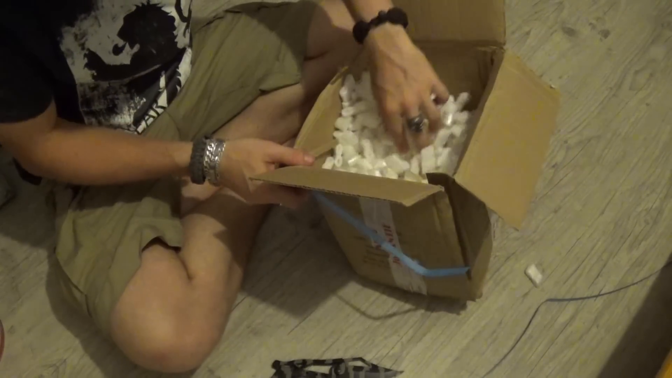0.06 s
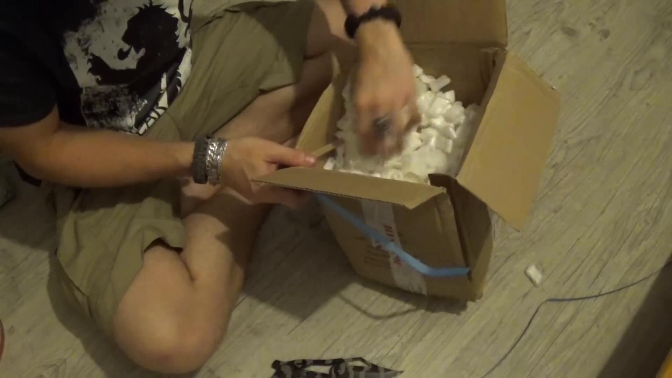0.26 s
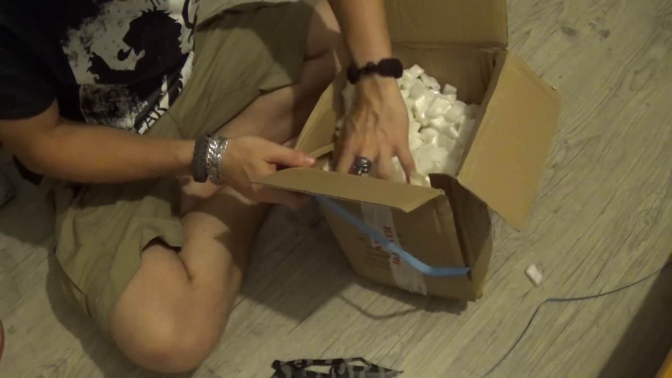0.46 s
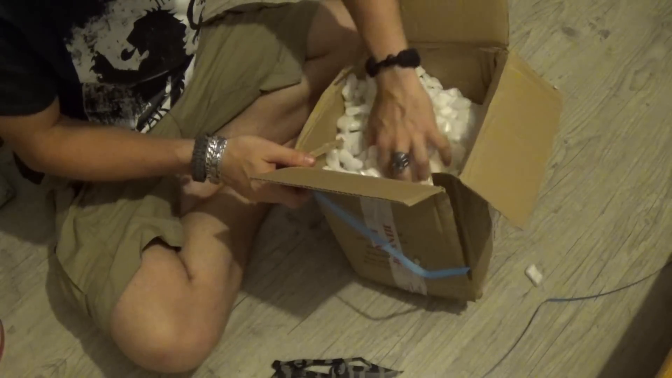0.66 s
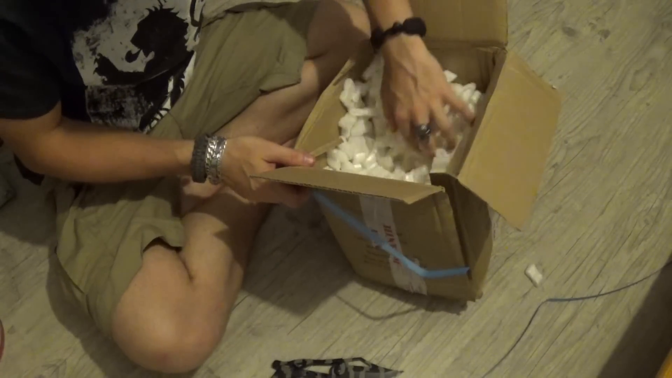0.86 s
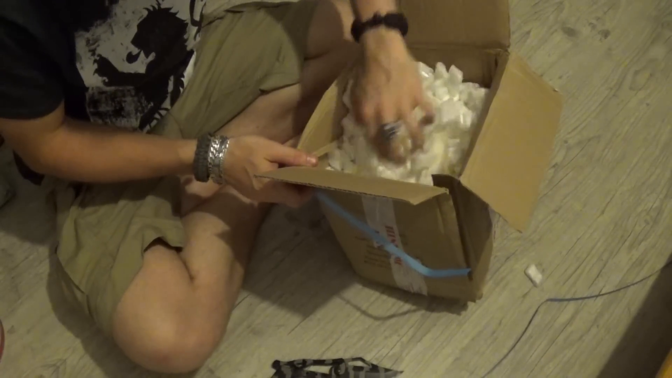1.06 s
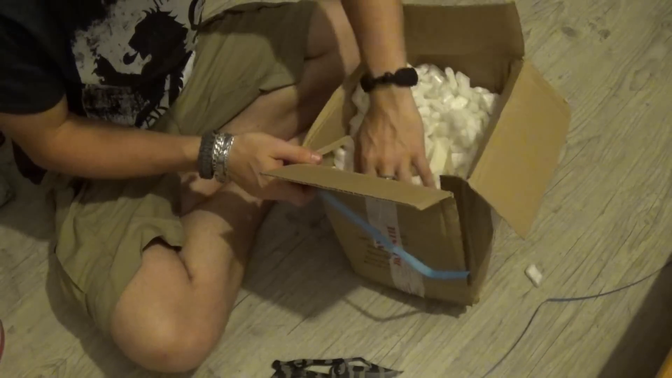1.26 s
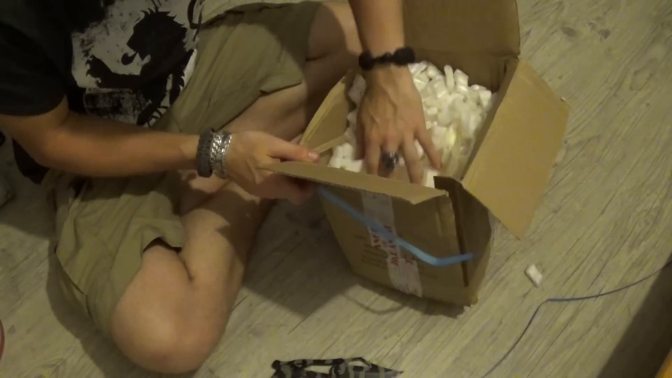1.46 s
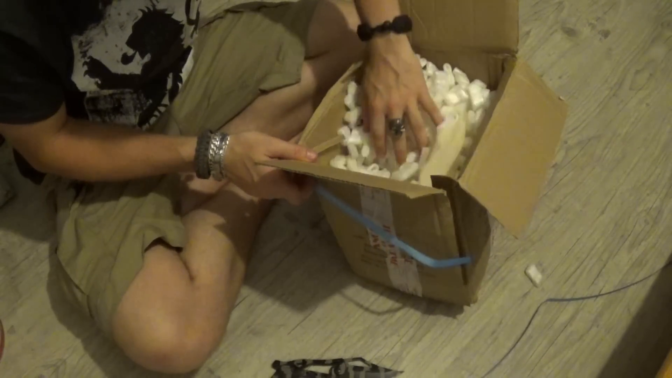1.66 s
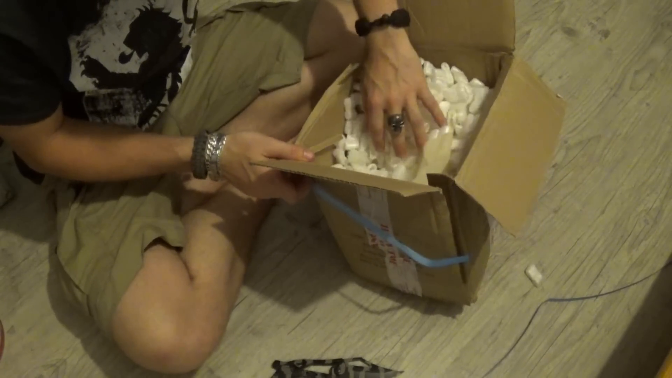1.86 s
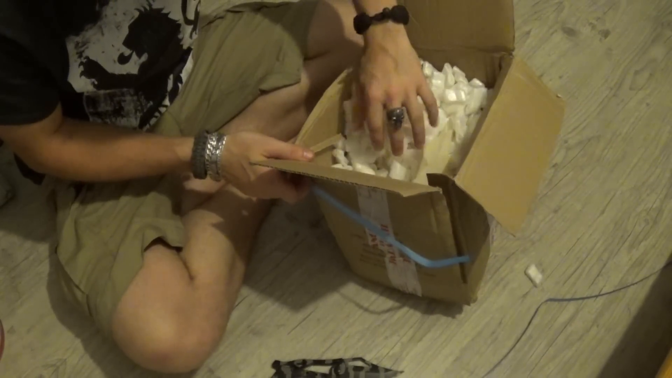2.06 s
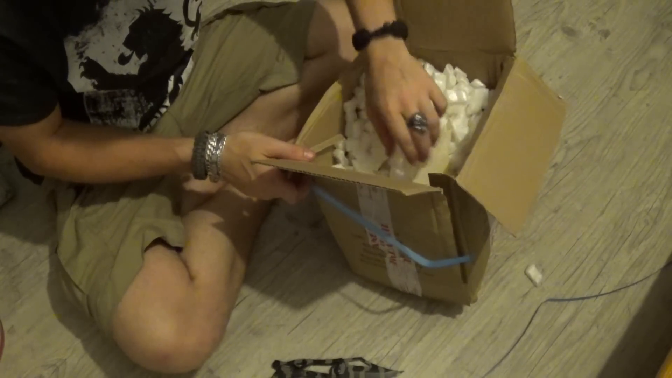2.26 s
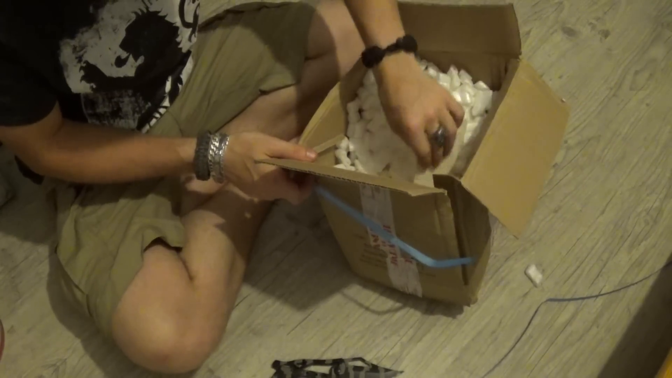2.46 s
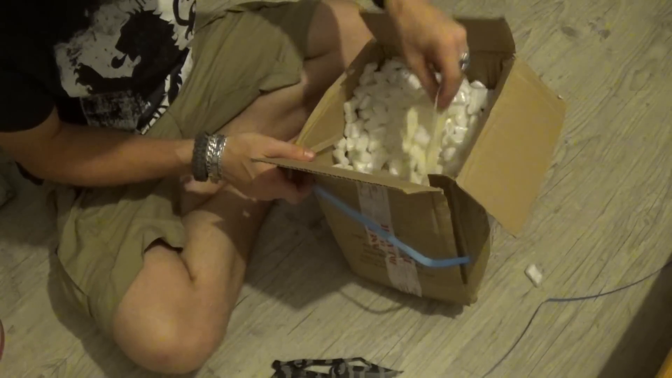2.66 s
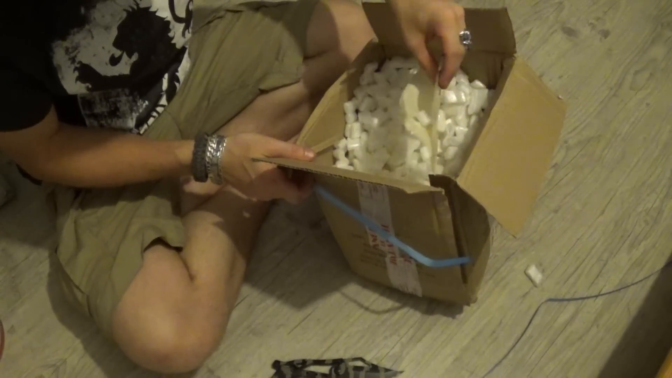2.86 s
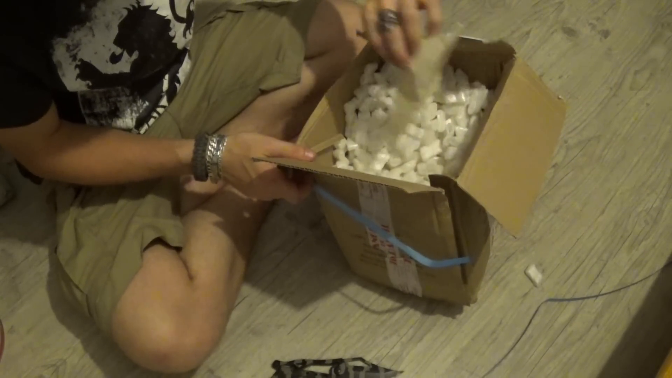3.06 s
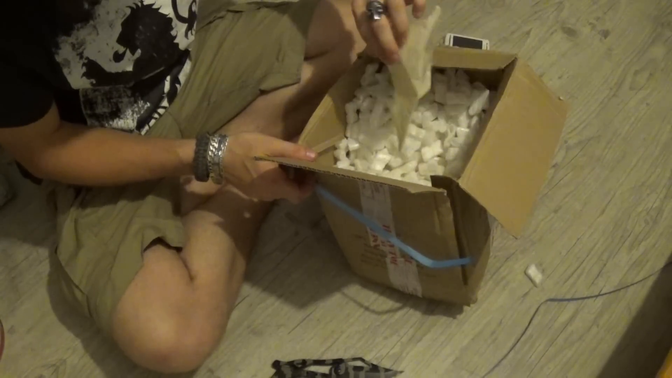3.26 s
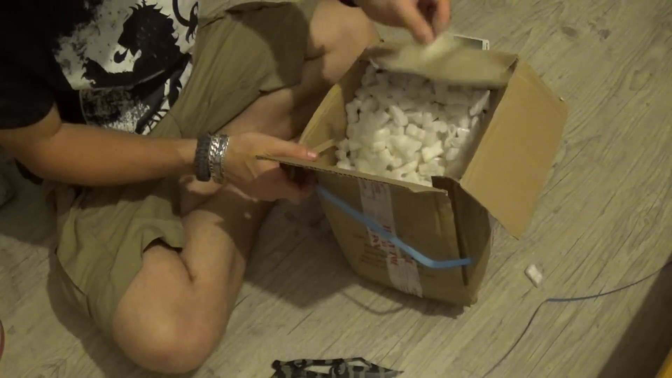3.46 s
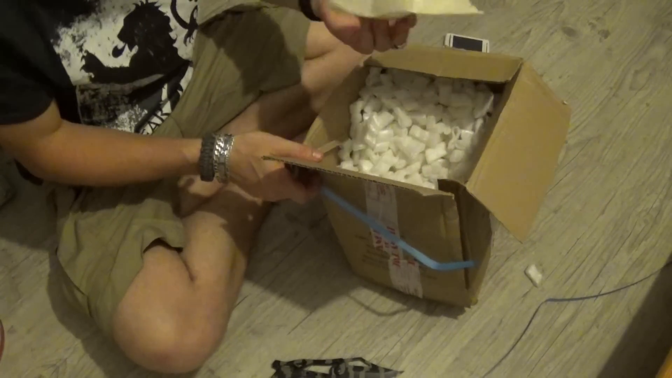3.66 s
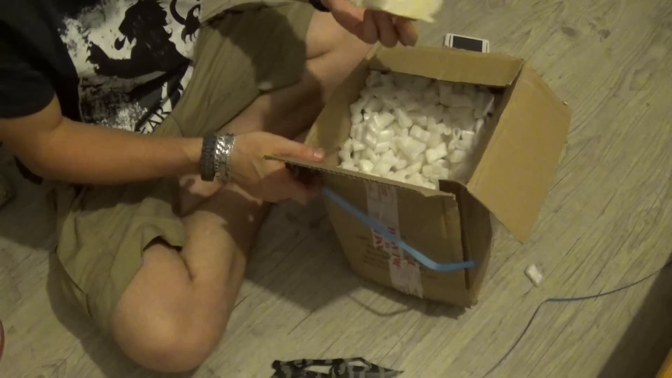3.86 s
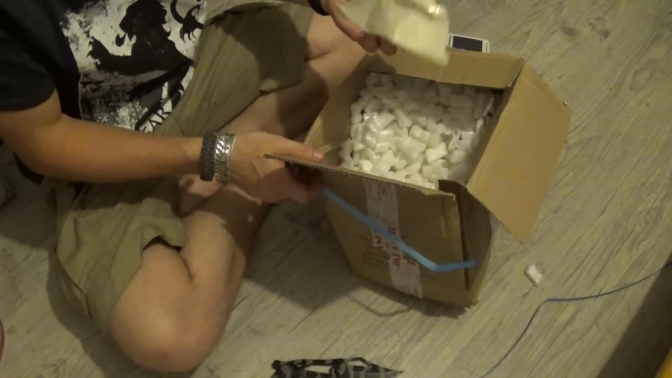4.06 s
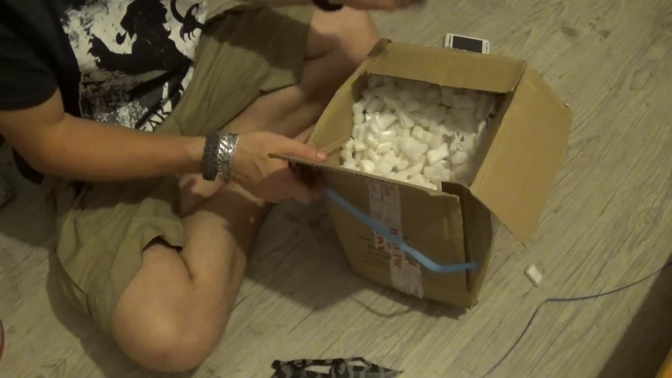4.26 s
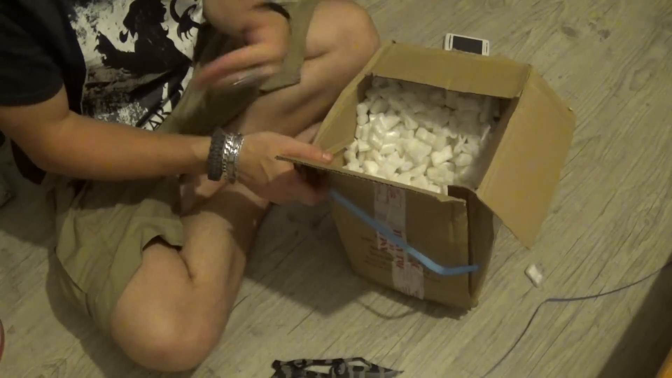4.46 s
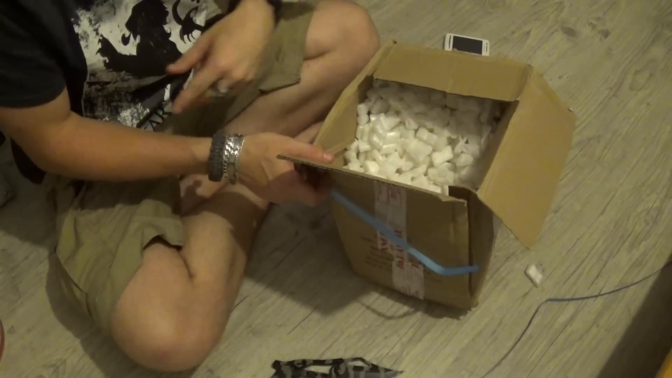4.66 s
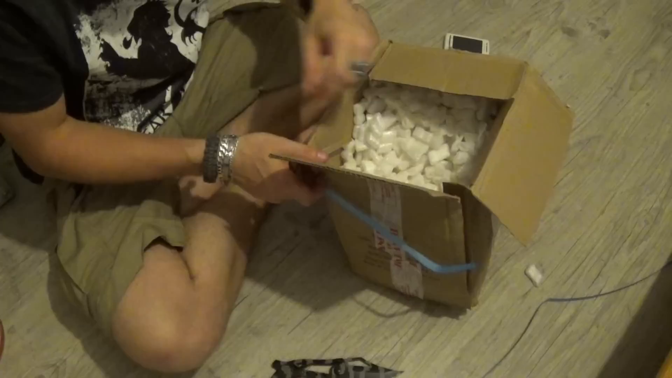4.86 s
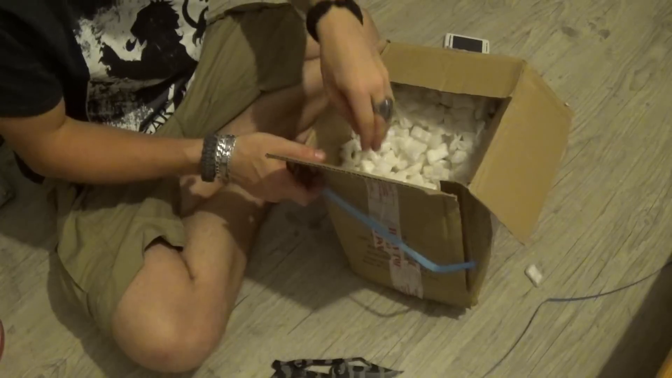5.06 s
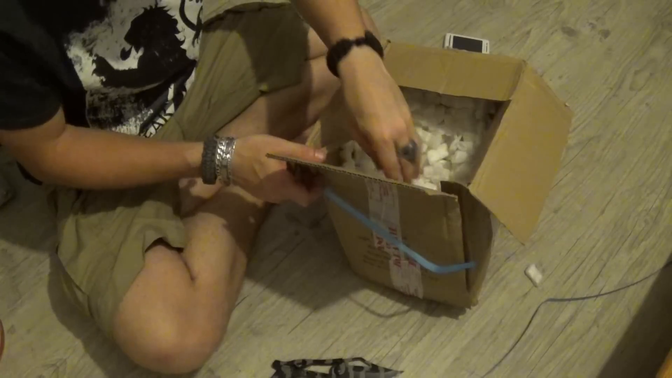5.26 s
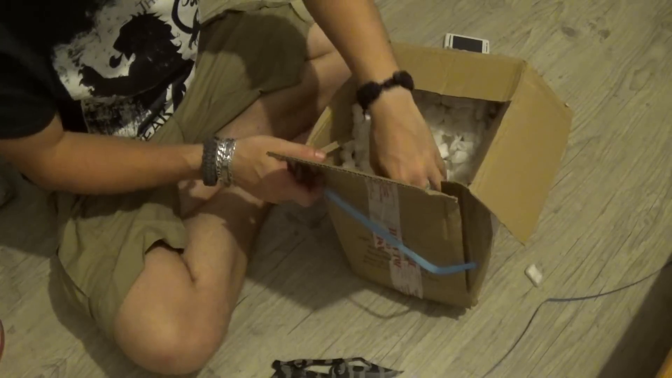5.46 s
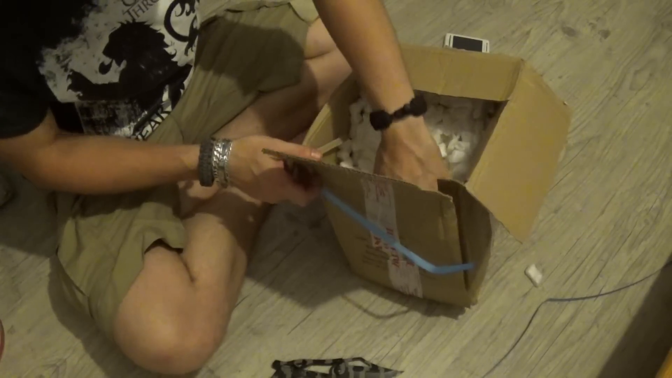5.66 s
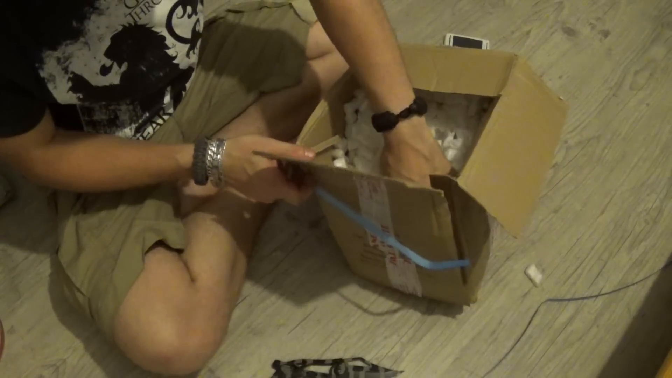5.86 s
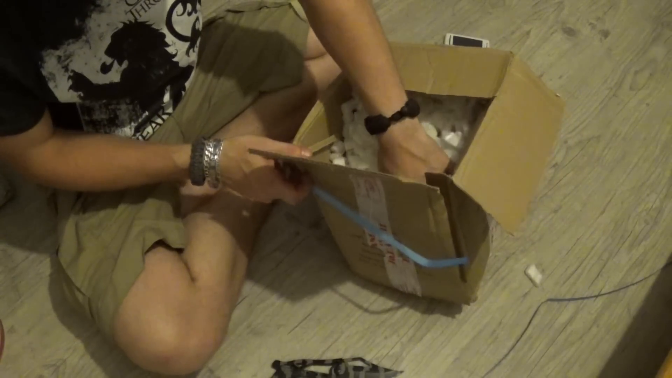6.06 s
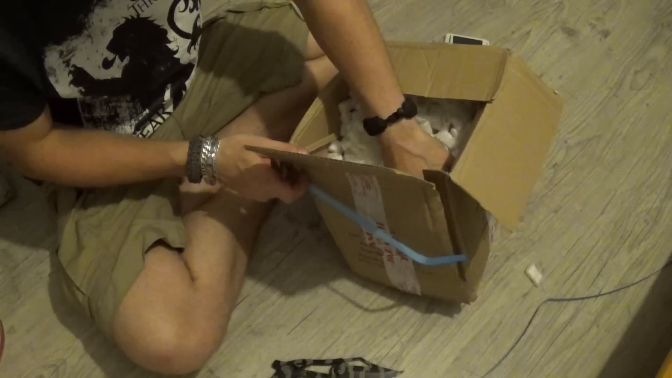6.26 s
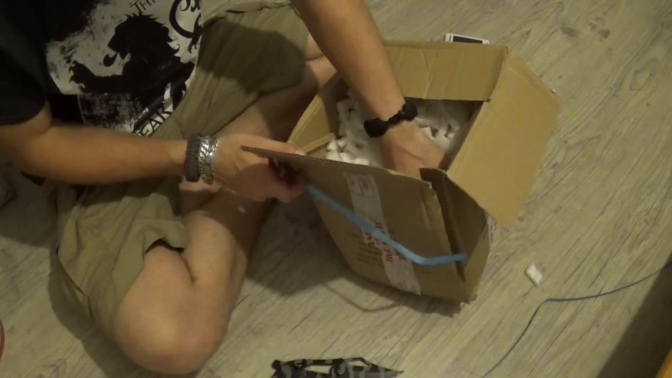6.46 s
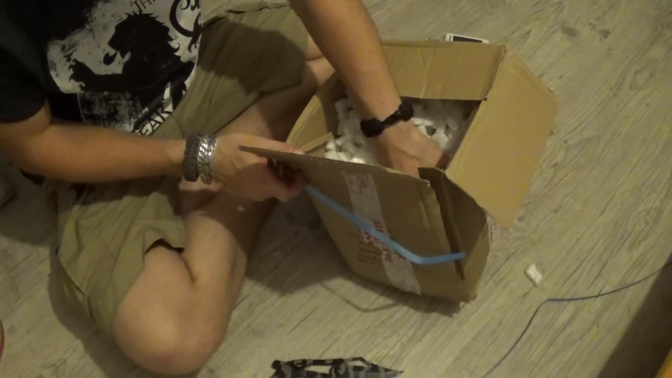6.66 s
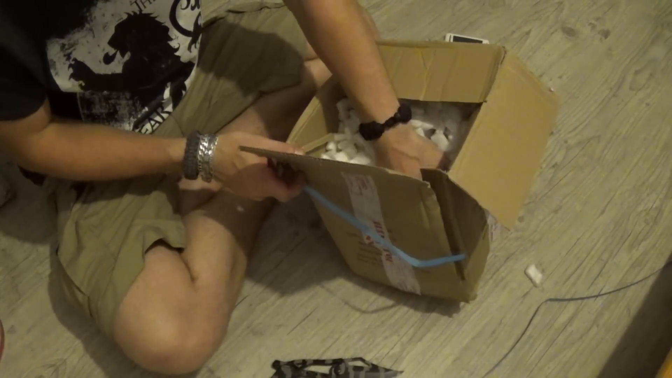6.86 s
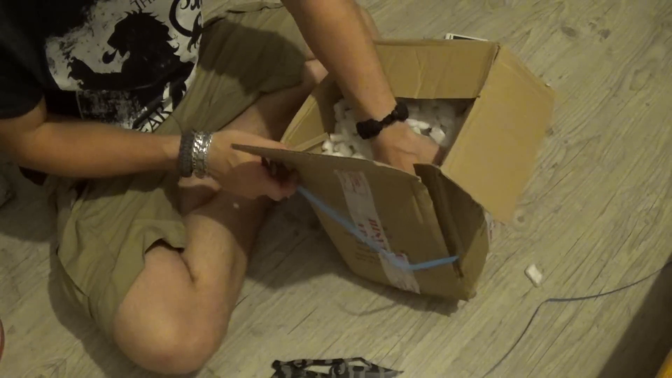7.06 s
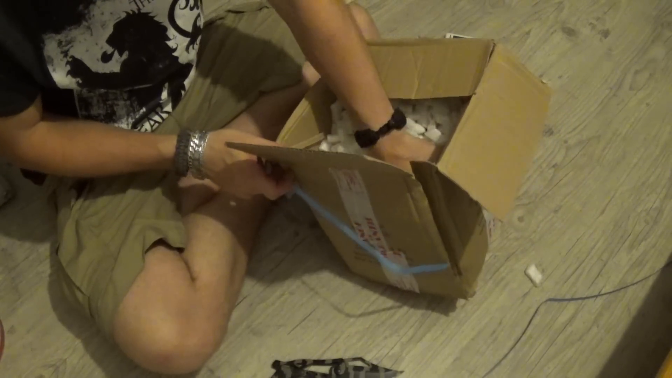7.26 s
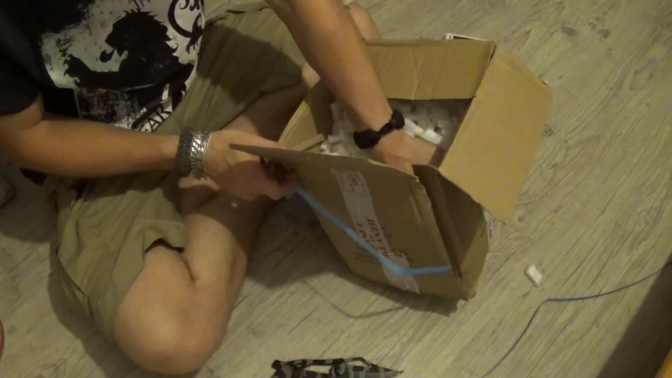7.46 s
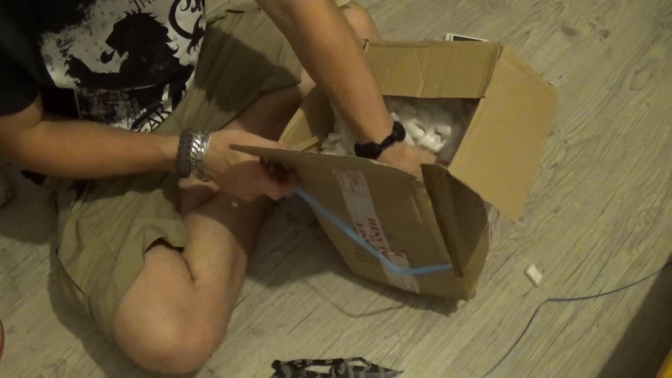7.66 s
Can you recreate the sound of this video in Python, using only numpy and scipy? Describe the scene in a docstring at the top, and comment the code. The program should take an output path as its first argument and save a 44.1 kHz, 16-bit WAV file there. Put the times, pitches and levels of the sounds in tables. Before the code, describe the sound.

A hand rummages through crackling foam packing peanuts in a cardboard box, pulls out a snapping thin packet, then digs in again deeper.

```python
"""Foam packing peanuts scrape and crackle as a hand rummages in a cardboard box on the floor of a small room.
The foam is stick-slip friction: dense random clicks through short rings and filters; the box drums along
in its panel resonances and in decaying modes. A thin packet is drawn out, snapping in bursts of noise as it
flexes, jewellery tinkles in high modes, and the hand digs in again, deeper. A pulsed tone trills faintly far
off over steady filtered noise, and decaying noise tails give the echo of the room."""
import sys
import numpy as np
from scipy import signal
from scipy.io import wavfile

SR = 44100
rng = np.random.default_rng(int(sys.argv[2]) if len(sys.argv) > 2 else 0)


def store_pcm(level_fs):
    """Save levels as 16-bit WAV."""
    pcm = np.round(np.clip(level_fs, -1, 1) * 32767).astype(np.int16)
    wavfile.write(sys.argv[1], SR, np.atleast_2d(pcm).T)


N = 340452
TIME = np.arange(N) / SR

# Strokes of the hand through the foam. Each row: start in seconds, length in seconds, nominal scraping
# level in dB, crispness (level above 7.5 kHz against the scraping) in dB.
STROKE_ROWS = [(-.02, 0.12, -29, -2), (0.116, 0.012, -28, -0.5), (0.198, .19, -42, -8.5),
               (0.446, 0.049, -32, 1), (0.505, 0.24, -25.5, -3), (0.747, 0.24, -27, -3.5),
               (1.108, 0.53, -40, -5), (1.326, 0.061, -28.5, -4.5), (1.429, 0.091, -26.5, -3),
               (1.528, 0.22, -23.5, -1.5), (1.942, 0.084, -42, 1.5), (2.07, 0.25, -47, -8.5),
               (2.34, 0.11, -45, -31), (2.516, 0.14, -45.5, -2), (2.608, 0.22, -45, -2.5),
               (5.527, 0.21, -53, -0.5), (5.711, 0.23, -35.5, -4), (5.987, 0.063, -33.5, -5),
               (6.138, 0.17, -33.5, -6), (6.353, 0.2, -31, -6.5), (6.575, 0.22, -32, -7),
               (6.818, 0.15, -30.5, -3.5), (7.018, 0.22, -34.5, -6.5), (7.186, 0.14, -32, -7),
               (7.363, 0.19, -27.5, -10), (7.49, 0.28, -26, -12.5)]
# Spectrum of rubbed foam. Each row: frequency in Hz, relative density in dB per Hz.
FOAM_SPECTRUM = [(530, -38), (900, -10.5), (1340, -4.5), (1750, 0.5), (2040, -1), (3550, 0), (4250, 2),
                 (5750, 1), (8550, -7), (9880, -5.5), (12600, -13), (16000, -21.5)]


def amp(db):
    """Level law: decibels to amplitude gain."""
    return 10 ** (np.asarray(db) / 20)


def unit(x):
    """Normalisation of power: scales to rms 1."""
    return x / np.sqrt(np.mean(x ** 2) + 1e-20)


def read(points, hz):
    """Linear interpolation of a table on a logarithmic frequency axis."""
    f, value = np.transpose(points)
    return np.interp(np.log(hz + 1), np.log(f + 1), value)


def add(mix, s, sound):
    """Superposition: adds a sound into the mix at a time in seconds."""
    part = mix[max(round(s * SR), 0):][:len(sound)]
    part += sound[:len(part)]


def butter(x, order, hz, kind="low"):
    """Causal Butterworth filtering, maximally flat in the pass band."""
    return signal.sosfilt(signal.butter(order, hz, kind, fs=SR, output="sos"), x)


def colour(x, spectrum, peaks=(), size=4096):
    """Minimum-phase filtering: the Hilbert transform of the log magnitude gives the phase of a causal filter."""
    hz = np.fft.rfftfreq(size, 1 / SR)
    resonances = sum(d / (1 + (2 * (hz - f) / width) ** 2) for f, width, d in peaks)
    db = read(spectrum, hz) + resonances
    half = np.log(amp(np.maximum(db, -90)))
    log_magnitude = np.r_[half, half[-2:0:-1]]
    taps = np.fft.ifft(np.exp(np.conj(signal.hilbert(log_magnitude)))).real
    return signal.oaconvolve(x, taps[:size // 2])[:len(x)]


def wander(per_s):
    """Slow random fluctuation of rms 1: straight lines between Gaussian knots."""
    knots = rng.standard_normal(N)
    return unit(np.interp(TIME * per_s, np.arange(N), knots))


def uneven(spread_db, count, most):
    """Random event sizes: gains whose decibels are exponentially distributed up to a limit."""
    return amp(spread_db * np.minimum(rng.exponential(1, count), most))


def slips(per_s, spread_db, clump_db, clumps_per_s):
    """Stick-slip friction: random tiny clicks of uneven size that come in clumps."""
    happens = rng.random(N) < per_s / SR
    clicks = uneven(spread_db, N, most=4) * rng.choice([-1, 1], N) * happens
    return unit(clicks * amp(clump_db * np.clip(wander(clumps_per_s), -2, 2)))


def gesture(start, length, grip_s=0.018, ease_db_per_s=8, settle_db_per_s=143):
    """Frictional effort in dB: a quick grip, easing as the foam yields, then the heap settles."""
    t = TIME - start
    grip = 20 * np.log10(np.clip(t / grip_s, 1e-6, 1))
    ease = ease_db_per_s * np.clip(t, 0, length)
    settle = settle_db_per_s * np.maximum(t - length, 0)
    return grip - ease - settle


def effort(rows):
    """Power addition of overlapping movements (start s, length s, dB) into one gain."""
    return np.sqrt(sum(amp(db + gesture(start, length)) ** 2 for start, length, db in rows))


def peanuts(per_s, spread_db, ring_s, count=40):
    """Stick-slip excitation of many peanuts, each slip with a short damped squeaky ring."""
    t, out = np.arange(SR // 100) / SR, np.zeros(N)
    for hz in np.linspace(700, 15800, count):
        at = rng.integers(0, N, int(per_s * N / SR))
        clicks = np.bincount(at, uneven(spread_db, len(at), most=4), N)
        damped = np.exp(-t / ring_s) * np.sin(2 * np.pi * hz * t)
        out += signal.oaconvolve(clicks, damped)[:N]
    return unit(out)


def jolts(per_s, spread_db, die_s):
    """Jamming: the heap gives way in sudden jolts whose gain dies exponentially in milliseconds."""
    kicks = uneven(spread_db, N, most=3) * (rng.random(N) < per_s / SR)
    power = signal.lfilter([1], [1, -np.exp(-2 / (die_s * SR))], kicks ** 2)
    return unit(np.sqrt(power + 1e-12))


def crackles(own_db=1.5, shared_db=-1.8, count=7):
    """Size sets pitch: peanuts of different sizes jerk free, each crackling in its own frequency band."""
    out, edges = np.zeros(N), np.geomspace(900, 19000, count + 2)
    for lo, hi in zip(edges, edges[2:]):
        jerks = jolts(per_s=120, spread_db=own_db, die_s=.0035)
        grains = jerks * slips(per_s=6000, spread_db=0.5, clump_db=-1.5, clumps_per_s=220)
        out += butter(grains, 2, [lo, hi], "band")
    return unit(out * jolts(per_s=610, spread_db=shared_db, die_s=0.011))


def rummage(body_db=-3.5, firm_db=-30.5, wall_db=-44, wall_share=0.87):
    """Frictional excitation: foam rubs and crackles under the hand and drives the resonant cardboard."""
    # Spectrum of the box walls. Each row: frequency in Hz, relative density in dB per Hz.
    wall_spectrum = [(24, -43), (40, -19), (92, -10), (146, -10), (182, -6), (290, -2), (340, -8.5),
                     (462, -3.5), (695, 0.5), (747, -1), (1140, -2), (1300, -3), (1690, -14.5),
                     (2860, -120)]
    # Panel resonances rubbed into sound. Each row: frequency in Hz, width in Hz, height in dB.
    panels = [(149.3, 11, 9.5), (347.4, 60, 12.5), (431, 29, 3), (554, 24, 3.5), (673, 25, 3)]
    grip = unit(amp(0.53 * wander(per_s=50)))
    rub = peanuts(per_s=170, spread_db=3.2, ring_s=.0005)
    foam = unit(colour(grip * (rub + amp(0.5) * crackles()), FOAM_SPECTRUM))
    # filtered both ways for zero phase, so that subtraction leaves the body
    top = signal.sosfiltfilt(signal.butter(2, 7500, "high", fs=SR, output="sos"), foam)
    drive = grip * slips(per_s=1500, spread_db=1.5, clump_db=2.2, clumps_per_s=56)
    walls = unit(colour(drive, wall_spectrum, panels))
    scrape = effort([(s, length, db) for s, length, db, crisp_db in STROKE_ROWS])
    crisp = effort([(s, length, db + crisp_db) for s, length, db, crisp_db in STROKE_ROWS])
    # walls sound at wall_db when the scrape is at firm_db, and follow only a share of each dB
    wall_gain = amp(wall_db) * (scrape / amp(firm_db)) ** wall_share
    return amp(body_db) * scrape * (foam - top) + crisp * unit(top) + wall_gain * walls


def ticks(per_s=22, spread_db=3, ring_s=.0007, level_db=-13, count=12):
    """Impulsive fracture: now and then a single peanut cracks, louder the harder the hand presses."""
    t, out = np.arange(SR // 100) / SR, np.zeros(N)
    for hz in np.geomspace(1600, 12000, count):
        clicks = uneven(spread_db, N, most=2) * (rng.random(N) < per_s / count / SR)
        tone_and_noise = np.sin(2 * np.pi * hz * t) + .5 * rng.standard_normal(len(t))
        out += signal.oaconvolve(clicks, np.exp(-t / ring_s) * tone_and_noise)[:N]
    press = effort([row[:3] for row in STROKE_ROWS])
    return amp(level_db) * press * unit(colour(out, FOAM_SPECTRUM))


def shudders():
    """Forced vibration: a dragged cardboard flap hums at one low pitch with unsteady strength."""
    # Each row: start in seconds, length in seconds, pitch in Hz, mean level in dB.
    drags = [(0, .15, 88, -57), (3.19, .28, 91.5, -55), (6.13, .22, 118.4, -55)]
    out = np.zeros(N)
    for s, length, hz, db in drags:
        t = np.arange(int(length * SR)) / SR
        unsteady = 1 + 0.3 * wander(per_s=24)[:len(t)]
        fade = signal.windows.tukey(len(t), .6)
        add(out, s, amp(db) * fade * np.sin(2 * np.pi * hz * t) * unsteady)
    return out


def floor(level_db=-61.5, side_db=-16):
    """Stationary filtered noise: steady hiss and low murmur of the quiet room."""
    # Each row: frequency in Hz, relative density in dB per Hz.
    murmur = [(12, -67), (20, -6), (58, -8), (81, -5.5), (127, -3), (158, 0), (182, -8), (216, -6.5),
              (337, -7.5), (3500, -16), (16000, -24.5)]
    mid, side = (unit(colour(rng.standard_normal(N), murmur)) for _ in range(2))
    return amp(level_db) * (mid + np.outer([1, -1], amp(side_db) * side))


def trill(hz=3500, level_db=-64.5, pulses_per_s=25, on_share=0.42):
    """Amplitude modulation: short, soft pulses of one high pitch, like a distant cricket."""
    phase = (TIME * pulses_per_s) % 1
    pulse = np.sin(np.pi * np.minimum(phase / on_share, 1)) ** 2
    level = amp(level_db + 1.5 * wander(per_s=16))
    return level * pulse * np.sin(2 * np.pi * hz * TIME + wander(per_s=60))


def tail(gap_s=0.0045):
    """Diffuse reverberation: two unrelated decaying noises, for mid and side, scaled to mid energy 1."""
    # Decay of the room. Each row: frequency in Hz, time to fall by 60 dB in seconds.
    decay = [(100, 0.25), (600, 0.68), (1800, 0.58), (4600, 0.4), (11000, 0.4), (14000, 0.24)]
    noise = rng.standard_normal((2, SR // 2))
    hz, t, z = signal.stft(noise, SR, nperseg=256)
    fading = z * amp(-60 * t / read(decay, hz)[:, None])
    echo = signal.istft(fading, SR, nperseg=256)[1]
    echo = echo * (np.arange(echo.shape[1]) > gap_s * SR)
    return echo / np.linalg.norm(echo[0])


def room(x, wet_db, side_db, count=3):
    """Reverberation by convolution, nearly alike left and right; paths change as hand and flaps move."""
    wet = np.zeros((2, N))
    for k in range(count):
        away = (TIME * 9 + k) % count - 1  # each tail takes its turn, nine turns a second
        share = np.cos(np.pi / 2 * np.clip(away, -1, 1))
        wet += signal.oaconvolve((share * x)[None], tail(), axes=1)[:, :N]
    mid, side = amp(wet_db) * wet
    return mid + np.outer([1, -1], amp(side_db) * side)


def snaps(ring_s=0.0033, again_db=-8, focus_db=1.9):
    """Buckling: a thin wall snaps in two steps, with milliseconds of dense ringing round its own pitch."""
    # Snaps of foam and packet. Each row: start in seconds, nominal peak level in dB, centre in Hz.
    buckles = [(.152, -14, 5530), (.617, -11, 5910), (.936, -8, 4370), (1.275, -18, 2200),
               (1.35, -16, 7170), (1.556, -9.5, 7420), (1.832, -18.5, 5530), (1.856, -15, 5050),
               (1.952, -18, 8400), (1.979, -17, 6560), (2.35, -28, 5000), (2.38, -27, 8000),
               (2.713, -22, 2760), (2.865, -27, 4760), (2.873, -29, 6000), (3.025, -22.5, 5500),
               (3.065, -27.5, 7120), (3.075, -20, 3170), (3.143, -15.5, 1580), (3.205, -15, 3060),
               (3.234, -29, 4500), (3.421, -28.5, 6080), (3.456, -21.5, 6300), (3.487, -14, 2590),
               (3.501, -16.5, 3000), (3.594, -30, 3740), (3.841, -15.5, 2280), (4.064, -36, 5770),
               (4.075, -31, 3720), (4.253, -27.5, 1650), (4.364, -23, 6080), (4.37, -11, 4040),
               (4.411, -20, 5960), (4.419, -9.5, 3500), (4.426, -9.5, 4430), (4.875, -28, 4000),
               (5.825, -20, 9800), (6.421, -13, 4890), (6.505, -12.5, 9350), (6.608, -19, 6220),
               (6.866, -17, 10100)]
    # Spectrum common to all snaps. Each row: frequency in Hz, relative density in dB per Hz.
    snap_spectrum = [(60, -14), (250, -16), (550, -4.5), (1050, -6), (1550, -3), (6000, -1.5), (10000, -6),
                     (13000, -4), (16000, -18)]
    t, out = np.arange(SR // 20) / SR, np.zeros(N)
    hz = np.geomspace(60, 16000, num=24)
    crack = np.exp(-t / ring_s) + .7 * np.exp(-t / .0005)
    for s, db, centre_hz in buckles:
        later = t - rng.uniform(0.00044, 0.0052)
        second_step = amp(again_db) * np.interp(later, t, crack, left=0)
        burst = rng.standard_normal(len(t)) * np.hypot(crack, second_step)
        octaves = np.log2(hz / centre_hz)
        shape = read(snap_spectrum, hz) - focus_db * np.minimum(octaves ** 2, 3.5)
        # the burst is set by its rms, which lies far below its peak
        add(out, s, amp(db - 22.5) * unit(colour(burst, np.c_[hz, shape])))
    return out


def ring(modes, centre_hz, jitter):
    """Modal decay after a blow, strongest near the pitch that suits its hardness and place."""
    t, out = np.arange(SR) / SR, np.zeros(SR)
    for f, db, t60 in modes:
        share = 1 / np.hypot(1, f / centre_hz - centre_hz / f)
        mode_hz = f * (1 + jitter * rng.uniform(-1, 1))
        out += share * amp(db - 60 * t / t60) * np.sin(2 * np.pi * mode_hz * t)
    return out


def knocks(puff_s=0.065, puff_db=-29):
    """Impact excitation: the hand knocks the box through the foam, giving modes and a puff of noise."""
    # Each row: start in seconds, nominal level in dB, frequency in Hz that the blow excites most.
    blows = [(0.583, -24.5, 393), (0.617, -34, 202), (1.273, -35, 706), (1.288, -21, 308),
             (1.344, -38, 140), (2.68, -33.5, 735), (2.814, -40, 330), (4.875, -39, 473), (5.68, -42, 162),
             (6.023, -36, 160), (6.944, -35, 265)]
    # Modes of the box. Each row: nominal frequency in Hz, relative level in dB, 60 dB decay in seconds.
    box_modes = [(154.7, -7.5, 0.44), (291, -50, .25), (346, -20, 0.27), (430, -10.5, 0.36),
                 (505, -11, 0.12), (556, -7.5, 0.11), (658, -10, 0.17), (888, -5.5, 0.067)]
    t, out = np.arange(SR) / SR, np.zeros(N)
    for s, db, centre_hz in blows:
        noise = rng.standard_normal(SR) * np.exp(-t / puff_s)
        puff = unit(butter(noise, 2, [centre_hz / 2, centre_hz * 2], "band"))
        add(out, s, amp(db) * (ring(box_modes, centre_hz, jitter=0.0053) + amp(puff_db) * puff))
    return butter(out, 2, 110, "high")  # small panels radiate little bass


def nose_breath(width_hz=170, level_db=-2):
    """Breath through the nose: a faint noise, filtered into one narrow, gliding band."""
    # A faint breath. Each row: time in seconds, pitch in Hz, level in dB before level_db.
    glide = [(2.049, 2080, -57), (2.21, 1963, -53), (2.27, 1987, -52), (2.32, 2066, -56), (2.37, 1875, -47),
             (2.41, 1830, -62)]
    s, hz, db = np.transpose(glide)
    flutter = unit(butter(rng.standard_normal((2, N)), 2, width_hz / 2))
    turn = 2 * np.pi * np.cumsum(np.interp(TIME, s, hz)) / SR
    level = amp(np.interp(TIME, s, db) + level_db) * (TIME > s[0]) * (TIME < s[-1])
    return level * (flutter[0] * np.cos(turn) + flutter[1] * np.sin(turn))


def slide():
    """Sliding friction: faint dry rustle of packet and cloth while the hand is out of the foam."""
    # Each row: start in seconds, length in seconds, nominal level in dB.
    rustles = [(2.39, 0.12, -48), (2.86, 0.16, -53), (3.02, 0.19, -50.5), (3.36, 0.46, -56.5),
               (3.95, 0.27, -61.5), (4.29, 0.23, -56), (4.55, 0.15, -59), (4.72, 0.059, -54.5),
               (4.88, 0.19, -61.5)]
    # Spectrum of the rustle. Each row: frequency in Hz, relative density in dB per Hz.
    packet_spectrum = [(100, -12), (300, 3.5), (700, -2), (1700, -2), (5000, -7), (10000, -7.5),
                       (16000, -22)]
    grains = slips(per_s=1700, spread_db=2.5, clump_db=0, clumps_per_s=73)
    return effort(rustles) * unit(colour(grains, packet_spectrum))


def jewellery():
    """Modal ringing of stiff metal: small pieces touch and ring very high."""
    # Touches. Each row: start in seconds, nominal level in dB.
    touches = [(3.978, -50), (4.065, -34), (4.104, -30.5), (4.794, -37.5)]
    # Modes of the metal. Each row: nominal frequency in Hz, relative level in dB, 60 dB decay in seconds.
    metal_modes = [(4748, -26, 0.23), (8030, -31, 0.27), (8480, -21, 0.3), (12410, -8.5, 0.22),
                   (12445, -20, 0.19), (13140, -26, .13)]
    out = np.zeros(N)
    for s, db in touches:
        add(out, s, amp(db) * ring(metal_modes, centre_hz=10000, jitter=.0004))
    return out


def scene(count=3):
    """Superposition of sources and echoes; a snap radiates a different ring towards each wall."""
    foam = rummage() + slide() + nose_breath()
    struck = knocks() + shudders() + jewellery()
    echo = room(foam, wet_db=-6.0, side_db=-7.5) + room(struck, wet_db=-9.5, side_db=-8)
    snap_echo = sum(room(snaps(), wet_db=-9.5, side_db=-6.0, count=2) for _ in range(count))
    return foam + struck + snaps() + echo + snap_echo + floor() + trill() + ticks()


def record(dry, edge_hz=15950):
    """Mid-side stereo: the image narrows in the top treble; a linear-phase filter then limits the band."""
    mid, side = dry.mean(0), (dry[0] - dry[1]) / 2
    side = butter(side, 4, 10000) * amp(-1)
    pair = np.array([mid + side, mid - side]) * amp([[-.1], [.1]])  # right slightly louder
    limit = signal.firwin(511, edge_hz, window=("kaiser", 9), fs=SR)
    return signal.oaconvolve(pair, limit[None], "same", axes=1)


dry = scene()
out = record(dry)
store_pcm(out)
```